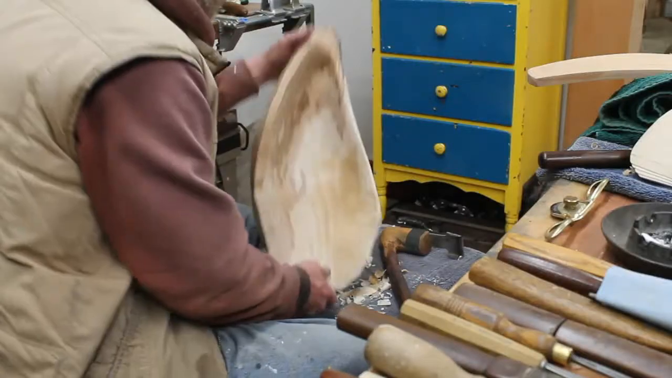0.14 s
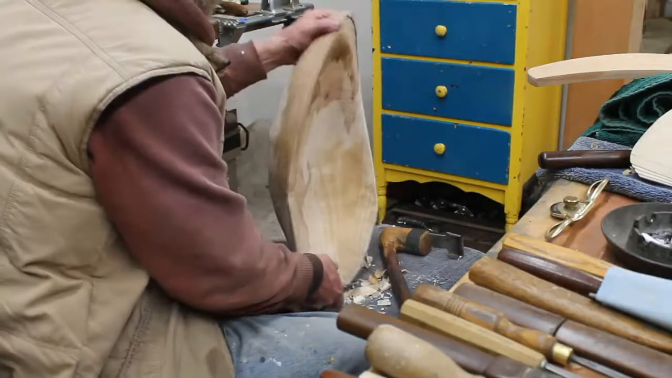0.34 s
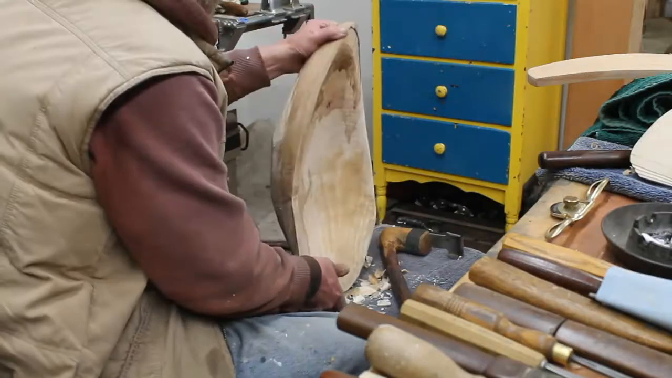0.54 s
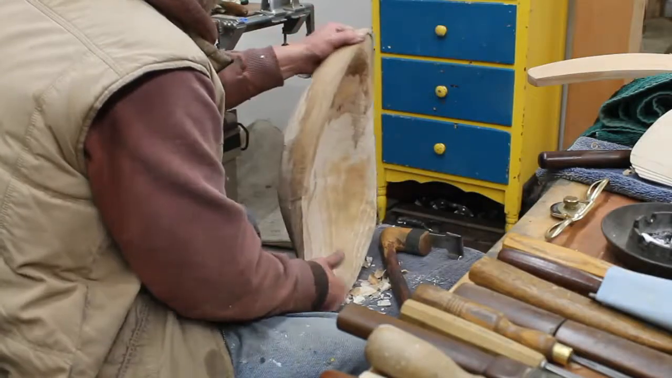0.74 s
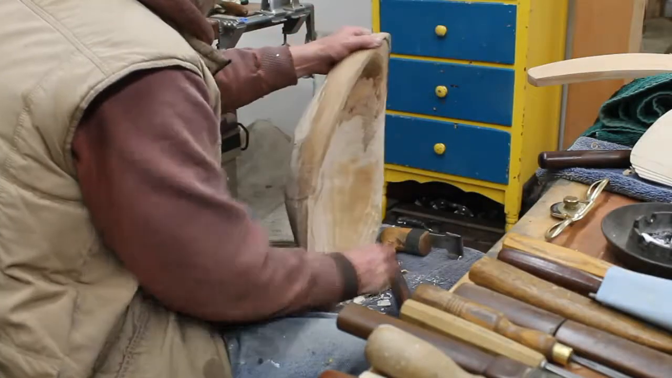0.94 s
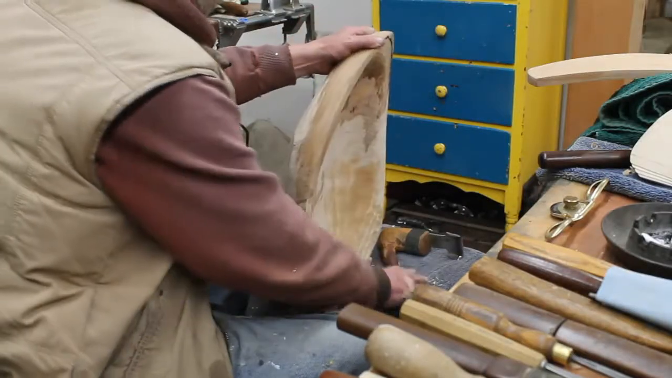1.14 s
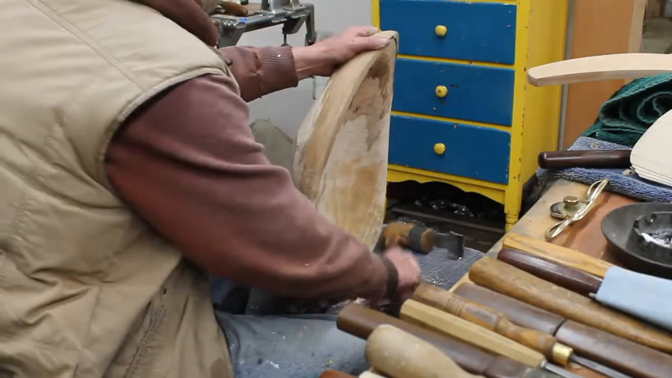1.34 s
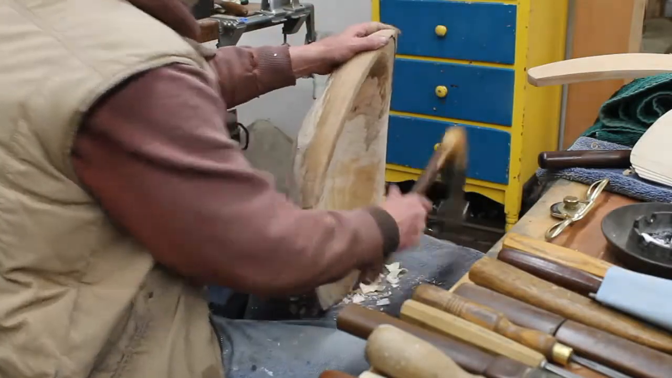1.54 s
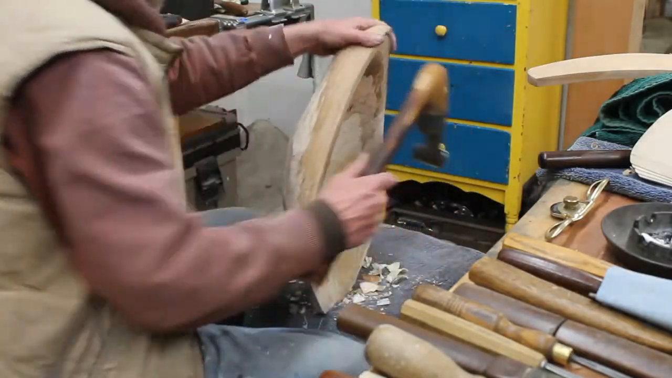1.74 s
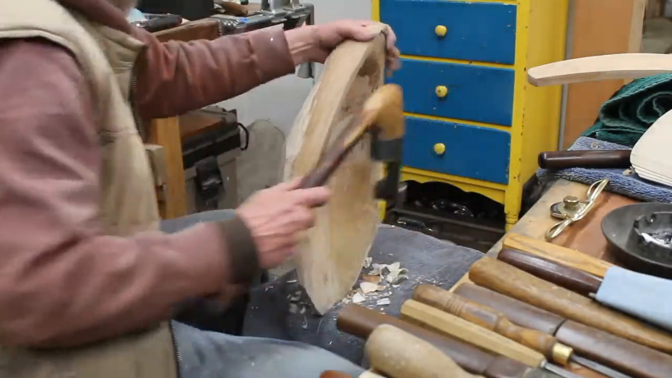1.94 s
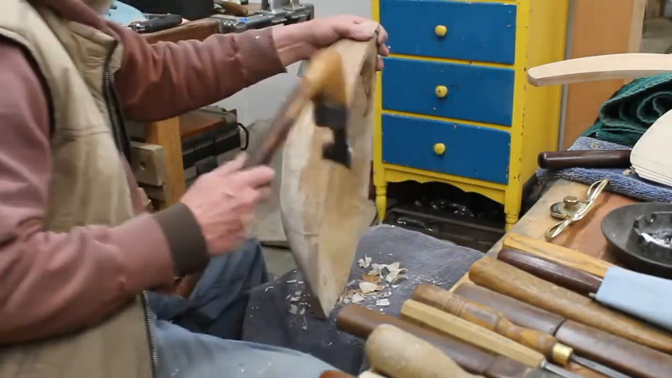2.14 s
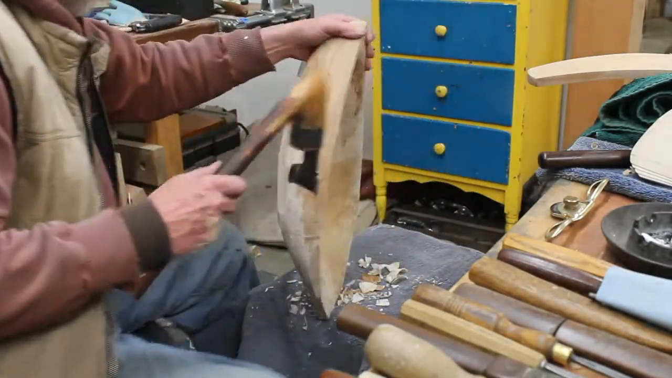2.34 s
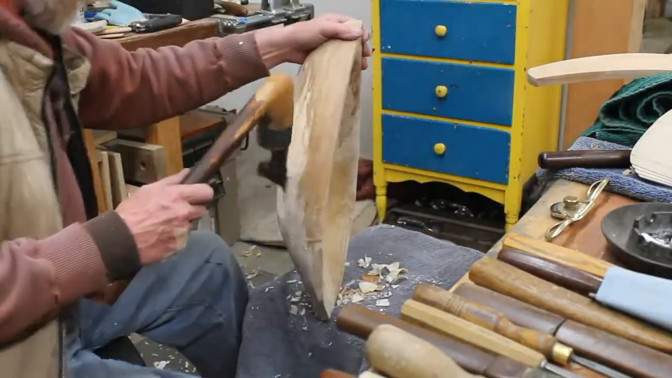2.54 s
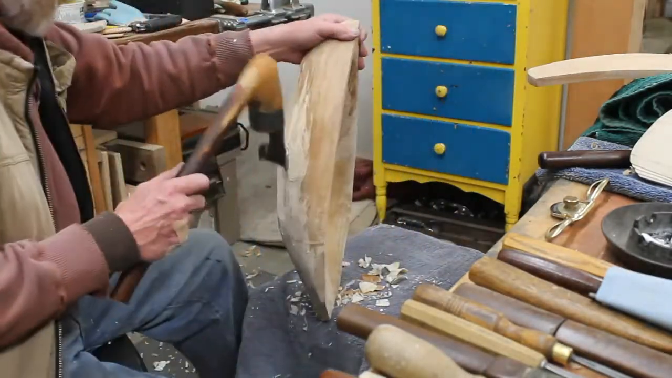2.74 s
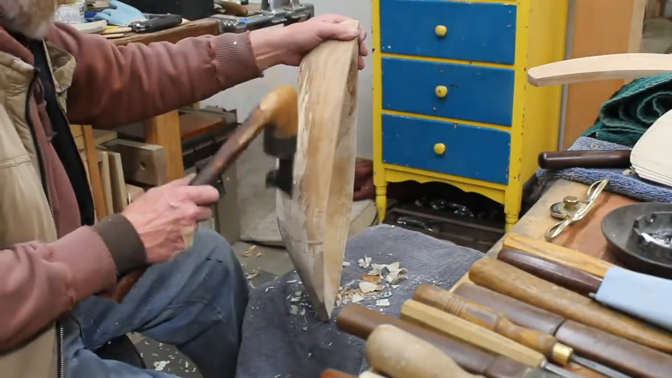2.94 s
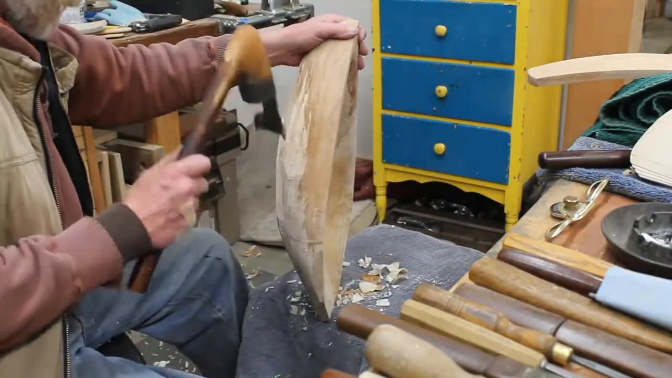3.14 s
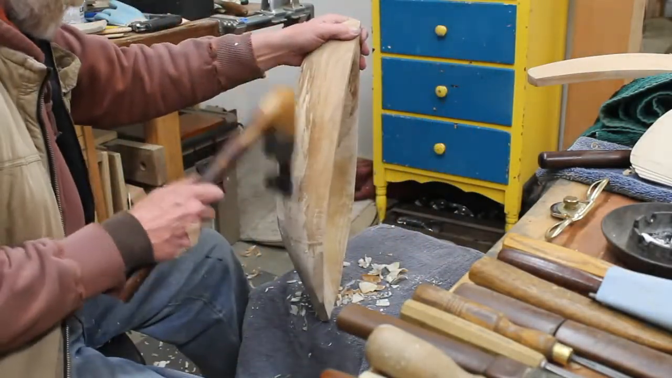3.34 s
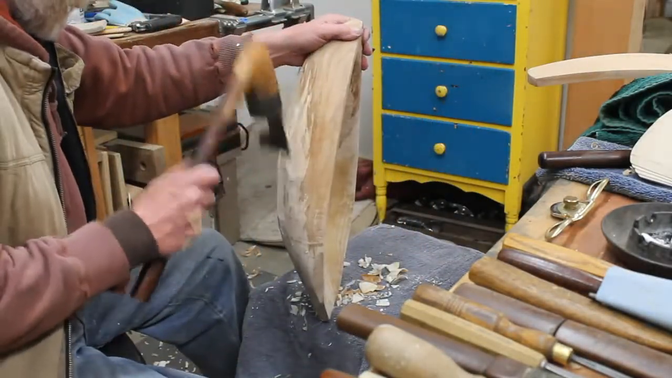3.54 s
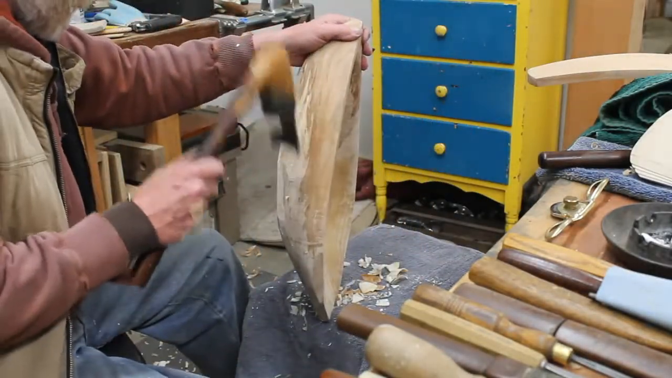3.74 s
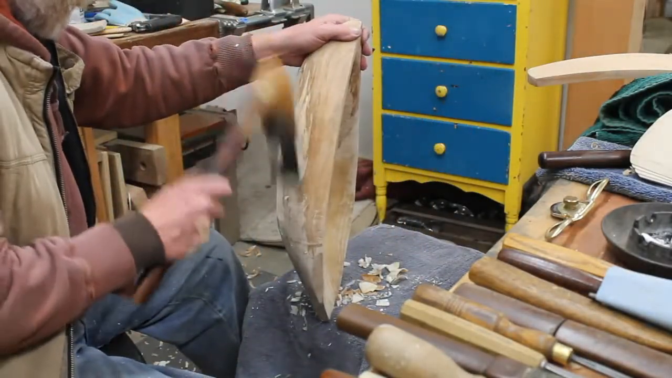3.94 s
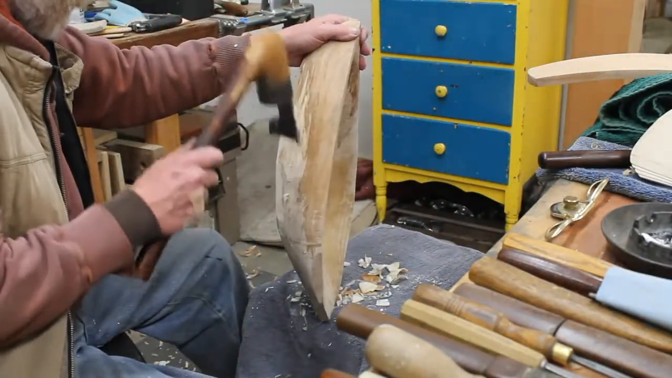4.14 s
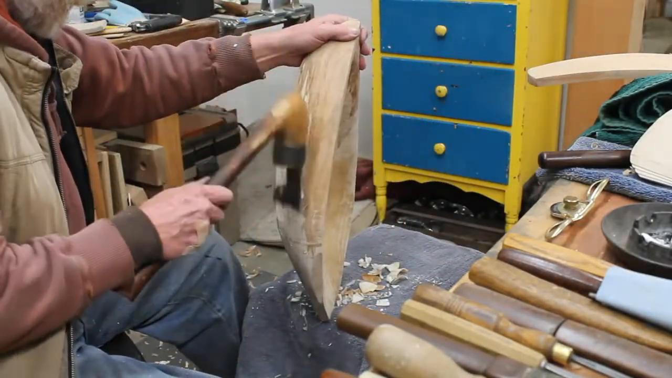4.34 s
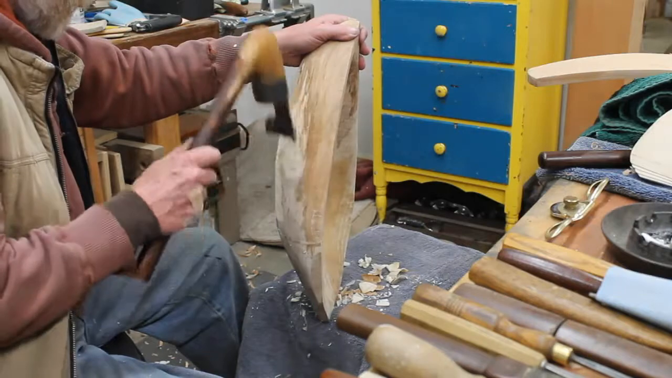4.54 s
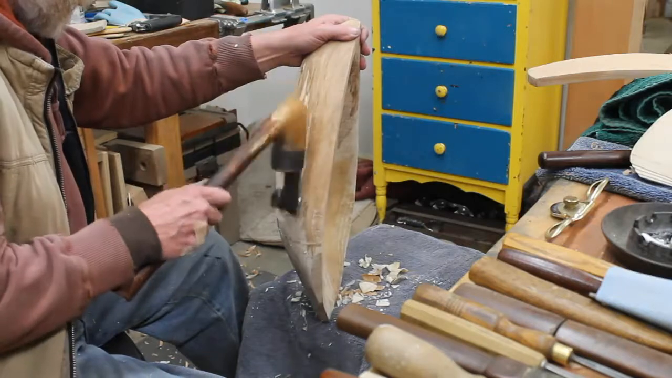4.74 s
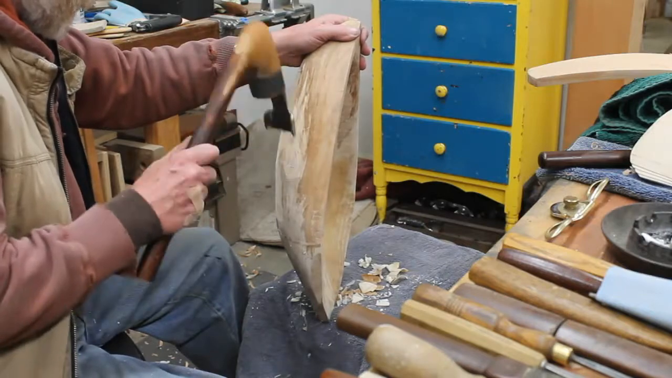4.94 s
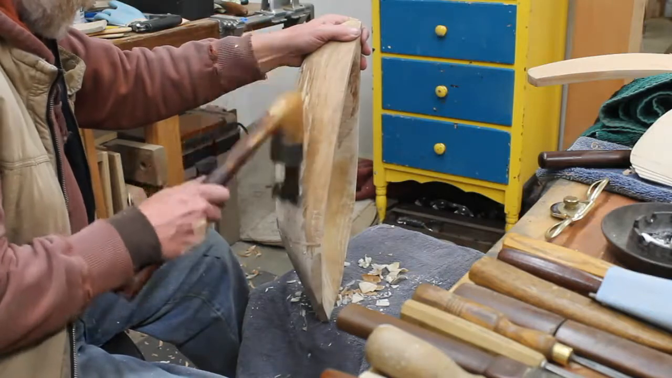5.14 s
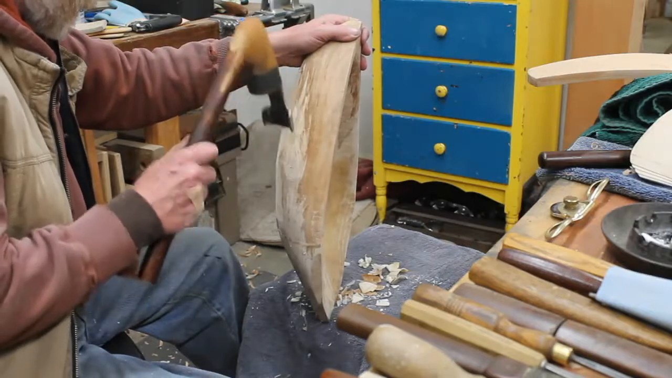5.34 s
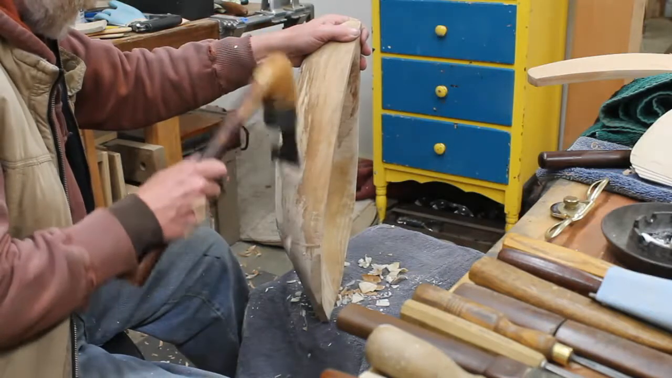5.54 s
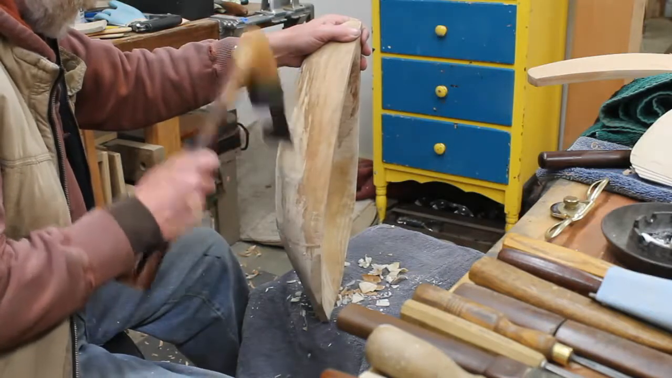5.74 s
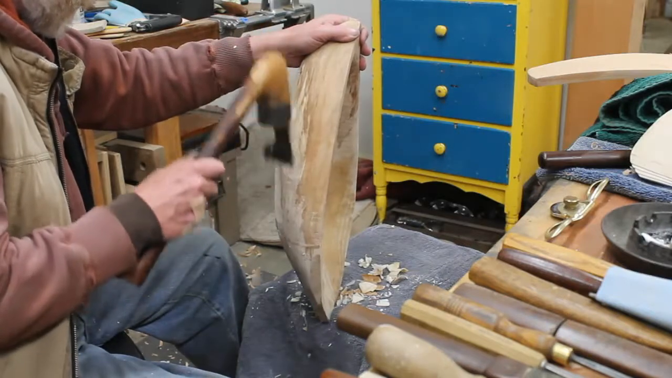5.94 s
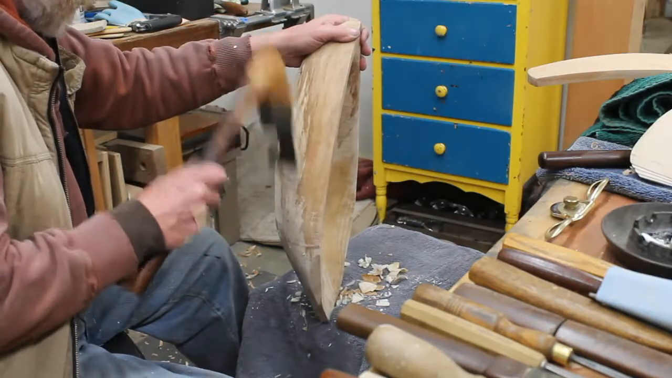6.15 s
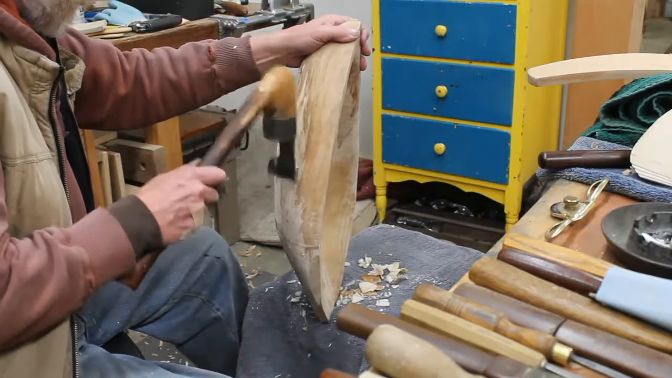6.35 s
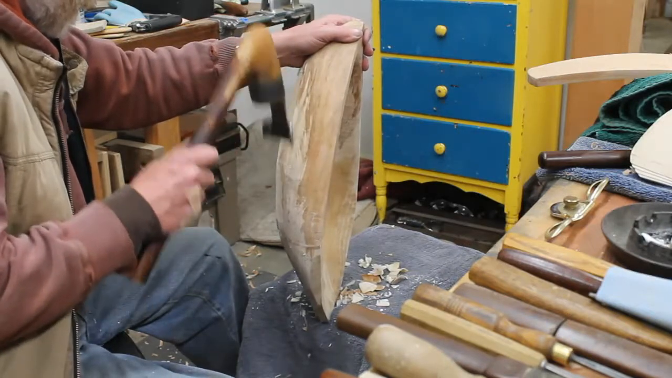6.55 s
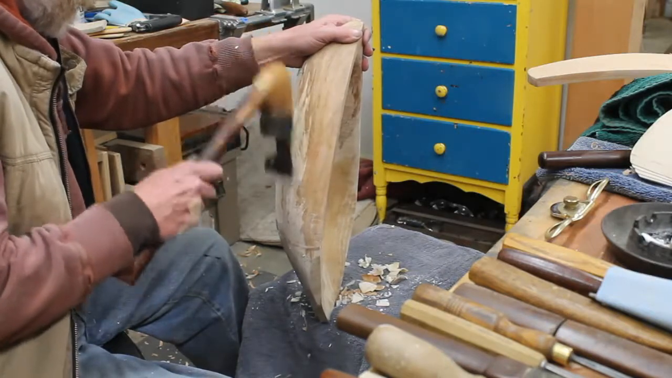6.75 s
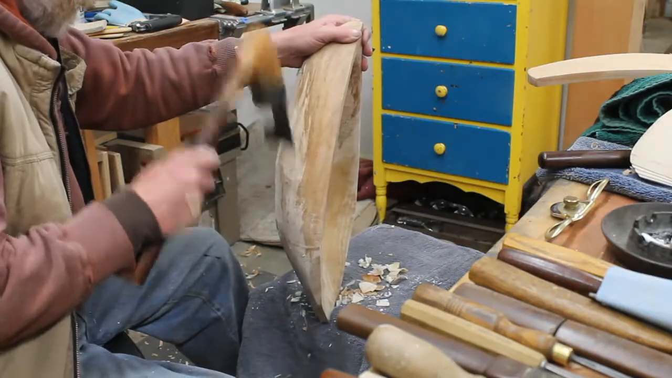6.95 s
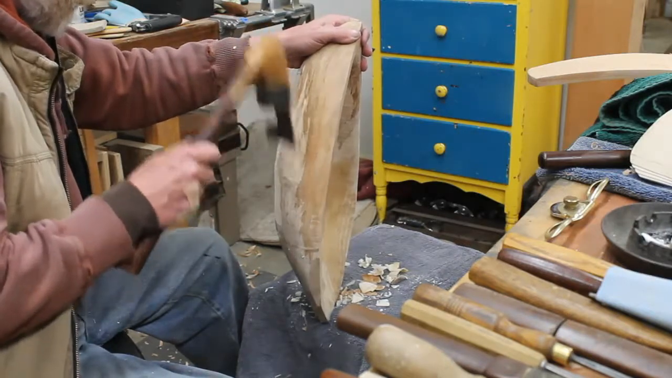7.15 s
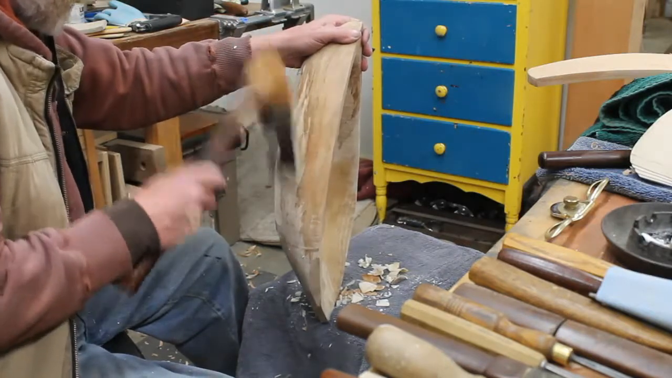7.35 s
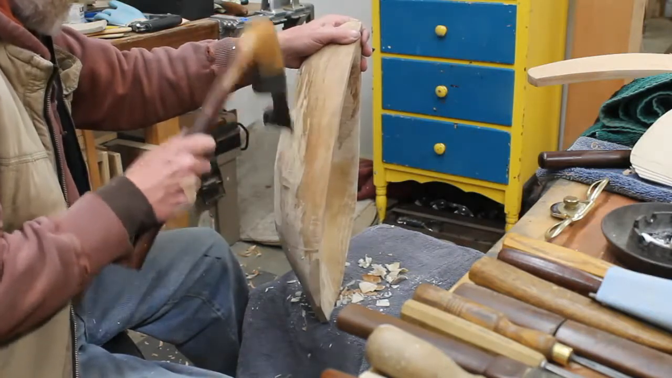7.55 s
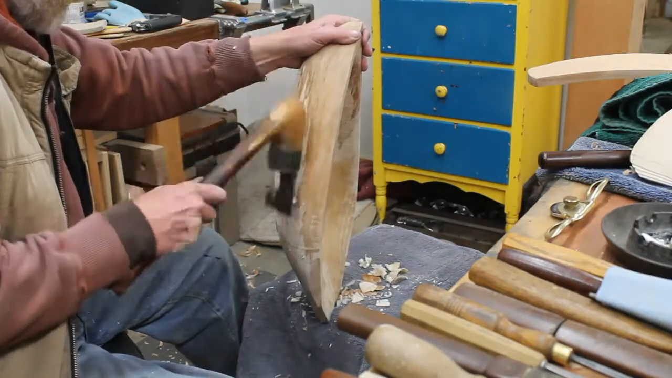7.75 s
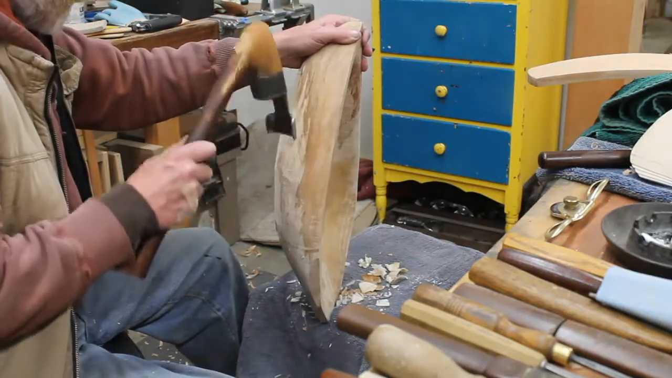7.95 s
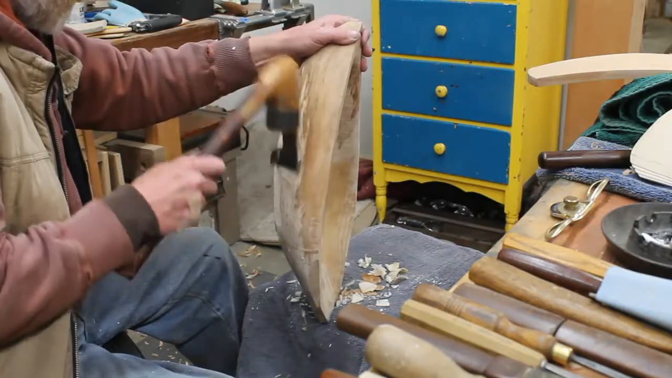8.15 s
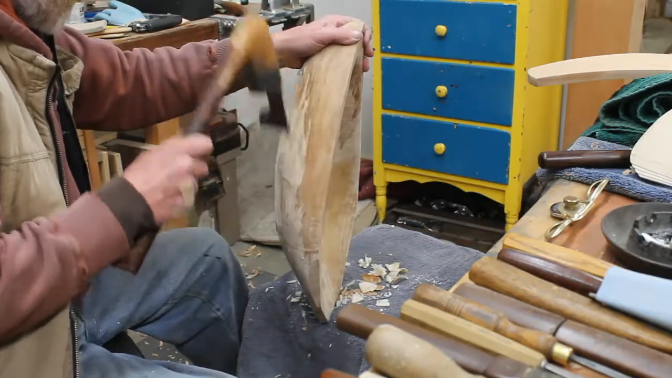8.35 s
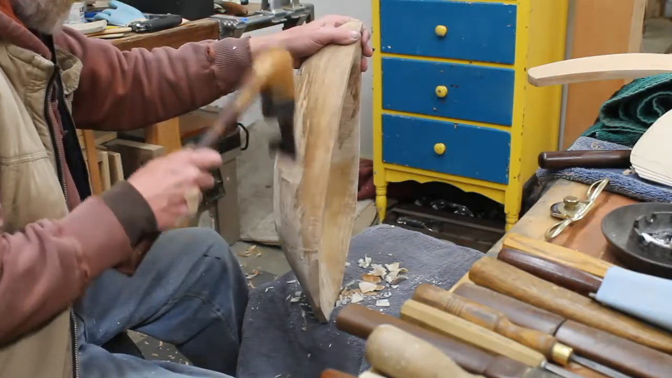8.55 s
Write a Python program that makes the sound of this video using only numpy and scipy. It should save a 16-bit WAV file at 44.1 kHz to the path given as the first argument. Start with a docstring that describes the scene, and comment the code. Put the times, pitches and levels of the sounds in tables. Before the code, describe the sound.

A jacket rustles as a wooden blank is handled, then a small hatchet chops it steadily with hollow knocks in a workshop.

```python
"""A small hatchet roughs out a block of green wood (the blank for a bowl) on a padded workshop bench.
First a jacket swishes and flops as the blank is turned, with bumps, ticks and clinks over quiet air.
Near 2 s the hatchet is picked up and its handle rubs in the hand. From 3.3 s come fifteen chops:
each knocks the hollow blank, rings the steel head, tears fibres and shakes the bench; the room echoes."""
import sys
import numpy as np
from scipy import signal
from scipy.fft import rfft, irfft, next_fast_len
from scipy.io import wavfile
from scipy.ndimage import uniform_filter1d

SR = 44100
rng = np.random.default_rng(int(sys.argv[2]) if len(sys.argv) > 2 else 0)


def put_to_file(sound):
    """Save the sound as 16-bit audio at rate SR, in the file named by the first command-line argument."""
    columns = np.atleast_2d(sound).T  # one column per channel
    safe = np.clip(columns, -1, 1)
    whole_steps = np.round(safe * 32767)
    wavfile.write(sys.argv[1], SR, whole_steps.astype(np.int16))


N = 379701
TIME = np.arange(N) / SR
HIT = int(.7 * SR)  # samples in one hit
AGE = np.arange(HIT) / SR  # seconds since a hit began

# tone of flapping cloth: f/Hz, level/dB
FLAP_TONE = [(30, -34), (70, -15.5), (130, -8.5), (220, 2.5), (330, 3), (450, -19), (900, -42)]
# tone of splitting wood and hard ticks: f/Hz, level/dB
SNAP_TONE = [(400, 2.5), (1500, 12.5), (3000, 11), (5000, 7.5), (7000, 6), (10500, 1.5), (12500, 6),
             (16000, 4.5)]


def gain(db):
    """Turn decibels into a multiplier."""
    return 10 ** (np.asarray(db) / 20)


def fade(t60):
    """Die away by 60 dB every t60 seconds."""
    return np.exp(-np.log(1000) * AGE / t60)


def along(points, hz):
    """Read between (frequency, value) points on a scale of octaves."""
    f, value = np.transpose(points)
    return np.interp(np.log(hz + 1), np.log(f), value)


def bins(size):
    """The frequencies in the spectrum of this many samples."""
    return np.arange(size // 2 + 1) * SR / size


def octaves(hz, centre_hz):
    """Octaves above (+) or below (-) a centre."""
    return np.log2((hz + 1) / centre_hz)


def colour(x, db):
    """Filter a hit by the given dB at bins(2 * HIT)."""
    cepstrum = irfft(np.log(gain(db)))
    cepstrum[1:HIT] *= 2  # folded so that nothing sounds before the hit
    cepstrum[HIT + 1:] = 0
    return irfft(rfft(x, 2 * HIT) * np.exp(rfft(cepstrum)))[:HIT]


def stream(x, tone):
    """Give a long noise its tone, at an average (rms) level of 1."""
    size = next_fast_len(N + N % 2, True) * 2
    y = irfft(rfft(x, size) * gain(along(tone, bins(size))))[:N]
    return y / y.std()


def low_cut(x, hz):
    """Remove the bass below hz."""
    return signal.sosfilt(signal.butter(4, hz, "high", fs=SR, output="sos"), x)


def level(x, db):
    """Scale a hit so that its energy, spread over 50 ms, has this level."""
    return x * gain(db) / np.sqrt(np.sum(x ** 2) * 20 / SR)


def add(out, s, x):
    """Mix a sound in at s seconds."""
    start = max(int(s * SR), 0)
    out[start:start + len(x)] += x[:N - start]


def later(x, s):
    """Delay a hit by s seconds."""
    return np.pad(x, (max(int(s * SR), 0), 0))[:HIT]


def ring(modes, scatter, uneven_db=0):
    """An object's fading notes (modes); pitch and strength vary with the grip and where it is struck."""
    out = 0
    for hz, db, t60 in modes:
        detune, share, sign = rng.standard_normal(3)
        note = np.sin(2 * np.pi * hz * (1 + scatter * detune) * AGE)
        out = out + np.sign(sign) * gain(db + uneven_db * share) * fade(t60) * note
    return out


def crackle(size, spread_db):
    """Dense tiny snaps of uneven strength, at an average level of 1."""
    x = rng.standard_normal(size) * gain(spread_db * np.minimum(rng.exponential(size=size), 6))
    return x / x.std()


def wander(rate):
    """A smooth random wobble of about 1 either way, with rate new values a second."""
    hold = int(SR / rate)
    steps = np.repeat(rng.standard_normal(N // hold + 1), hold)
    return 1.3 * uniform_filter1d(uniform_filter1d(steps, hold), hold)[:N]


def stroke(peak_s, rise_s, fall_s):
    """One movement: from rest smoothly up to 1 and back."""
    phase = np.interp(TIME, [peak_s - rise_s, peak_s, peak_s + fall_s], [-1, 0, 1])
    return (1 + np.cos(np.pi * phase)) / 2


def workshop(wet_db, early_db=-2):
    """The room: direct sound, quick echoes off bench and cabinet, and a tail that grows duller."""
    # how long the room rings: f/Hz, t60/s
    decay = [(100, 0.45), (500, 0.59), (1400, 0.53), (4000, 0.54), (10000, 0.43), (16000, 0.2)]
    hz, noise = bins(HIT), rfft(crackle(HIT, 2.05))
    tail = 0
    for centre_hz in 62.5 * 2. ** np.arange(9):
        band = irfft(noise * np.maximum(1 - abs(octaves(hz, centre_hz)), 0), HIT)
        tail = tail + band * fade(along(decay, centre_hz))
    early = crackle(HIT, 7.1) * fade(0.12)
    echoes = tail / np.linalg.norm(tail) + gain(early_db) * early / np.linalg.norm(early)
    room = later(echoes, .004) * gain(wet_db)
    room[0] += 1  # the direct sound
    return room


def heard(x, room, db):
    """A hit as it arrives through the room, at level db."""
    return level(signal.fftconvolve(x, room)[:HIT], db)


def taps(table, tone, t60, focus_db, wet_db):
    """Short contacts, each turned down by focus_db per octave away from its own centre."""
    out, hz = np.zeros(N), bins(2 * HIT)
    for s, db, centre_hz in table:
        shape = along(tone, hz) - focus_db * np.minimum(abs(octaves(hz, centre_hz)), 4)
        tap = colour(crackle(HIT, 1.4) * fade(t60), shape)
        add(out, s, heard(tap, workshop(wet_db, early_db=-5.5), db))
    return out


def air():
    """The quiet air of the shop: a soft noise that wavers slightly."""
    # tone of the air: f/Hz, level/dB
    tone = [(20, -45), (40, -34), (65, -12), (140, -7), (215, -6), (415, 1), (600, -1.5), (1630, -5),
            (2000, -4.5), (3100, -8), (8000, -14.5), (16000, -24)]
    return stream(rng.standard_normal(N), tone) * gain(-61 + 0.52 * wander(3.97))


def cloth(rub_db=-6, hiss_db=-8, flap_db=-25):
    """Jacket threads catch and slip, swishing with the arm's speed; light touches hiss, firm ones rub."""
    # arm movements: fastest at t/s, speeding up/s, slowing down/s, level/dB, brightness/dB
    moves = [(.015, 0.089, 0.03, -53, 3), (.17, 0.22, .2, -55, 0.5), (.43, 0.19, .1, -53.5, -4),
             (.72, 0.13, 0.11, -55.5, -2), (.83, 0.1, 0.1, -54, -6), (1.11, 0.27, 0.14, -58.5, -1.5),
             (1.37, 0.5, 0.29, -57.5, -1.5), (1.88, 0.41, 0.3, -51.5, -3.5), (2.14, 0.19, 0.28, -58, 0.5),
             (2.32, 0.14, 0.34, -48.5, 1), (2.5, 0.23, 0.25, -41, -0.5), (2.631, 0.081, 0.052, -34, 2.5),
             (2.705, 0.056, 0.058, -40, -1.5), (3.115, 0.12, 0.098, -53.5, 1)]
    # tones of the sliding weave: f/Hz, level/dB
    rub_tone = [(180, -45), (330, -9), (650, 0), (1300, -1), (2000, -11), (4000, -35)]
    swish_tone = [(800, -6), (1500, 4.5), (2500, 2), (4500, 1.5), (6500, -2), (9000, -12.5), (14000, -70)]
    hiss_tone = [(4000, -23.5), (7500, 1.5), (10000, -2), (13000, -5.5), (16000, -13)]
    swish = rub = hiss = 0
    for s, rise_s, fall_s, db, bright_db in moves:
        slide = stroke(s, rise_s, fall_s) * gain(db)
        swish = swish + slide ** 2
        rub = rub + (slide * gain(rub_db - bright_db)) ** 2
        hiss = hiss + (slide * gain(hiss_db + bright_db)) ** 2
    # the folds stir even in slow movements
    flap = swish.max() * (swish / swish.max()) ** 0.59 * gain(flap_db) ** 2
    catch = gain(2.5 * wander(70))
    out = 0
    for tone, power in (FLAP_TONE, flap), (rub_tone, rub), (swish_tone, swish), (hiss_tone, hiss):
        out = out + stream(crackle(N, 2.0) * catch, tone) * np.sqrt(power)
    room = workshop(wet_db=-1, early_db=-11)
    out = signal.fftconvolve(out, room / np.linalg.norm(room))[:N]
    return low_cut(out, 135)  # the cloth's bass below 135 Hz is removed


def clinks(t60=0.0063):
    """Loose chips and tools are jolted on the bench and ring briefly."""
    # jolts: t/s, level/dB, f/Hz
    jolts = [(.2468, -48, 4700), (.358, -55, 4800), (3.899, -57.5, 2450), (6.49, -52.5, 3530)]
    out, room = np.zeros(N), workshop(wet_db=-2)
    for s, db, hz in jolts:
        modes = [(0.88 * hz, -4, t60), (hz, 0, t60), (0.75 * hz, -4, t60)]
        add(out, s, heard(ring(modes, scatter=0.0091), room, db))
    return out


def bumps():
    """Hand and handle bump the wood."""
    # bumps: t/s, level/dB, centre f/Hz
    hits = [(.247, -45.5, 1850), (.357, -53, 2030), (.422, -48, 870), (.47, -57, 600), (1.731, -49.5, 1010),
            (1.912, -44.5, 1230), (1.962, -41, 1160), (2.125, -40.5, 1410), (2.26, -40.5, 990),
            (3.565, -54, 1460), (3.75, -50, 770), (4.678, -47.5, 1600), (6.166, -54.5, 704)]
    # tone of bumped wood: f/Hz, level/dB
    tone = [(70, -35), (200, 3.5), (400, 1), (650, 6), (1100, -5), (2500, -3.5), (5000, -23.5), (9000, -12),
            (16000, -31)]
    return taps(hits, tone, t60=0.015, focus_db=6.0, wet_db=0.5)


def ticks():
    """The tool, splinters and jacket fastenings make small hard contacts."""
    # ticks: t/s, level/dB, centre f/Hz
    hits = [(.2485, -48.5, 2250), (.357, -62, 2400), (1.874, -51.5, 5050), (1.962, -51, 2180),
            (2.125, -48, 2800), (2.275, -44, 4600), (2.286, -52, 4400), (2.439, -37.5, 3480),
            (2.4605, -36.5, 2580), (2.472, -33.5, 3720), (2.698, -38.5, 3600), (2.711, -38.5, 3340),
            (3.549, -69, 4000), (4.388, -51, 5600), (6.135, -56, 3540), (7.4008, -47.5, 3620),
            (8.045, -57.5, 4540)]
    return taps(hits, SNAP_TONE, t60=0.019, focus_db=7.5, wet_db=-5.0)


def folds():
    """Heavy folds of the jacket flop over."""
    # flops: t/s, level/dB, centre f/Hz
    flops = [(.425, -61, 260), (1.335, -64, 230), (1.41, -61, 259), (2.485, -53.5, 210)]
    return taps(flops, FLAP_TONE, t60=0.13, focus_db=8, wet_db=-1)


def handle_rub():
    """The handle sticks and slips through the fingers as the hatchet is picked up."""
    # shifts of grip: firmest at t/s, tightening/s, easing/s, level/dB
    grips = [(1.775, 0.055, 0.15, -45.5), (1.9, 0.052, 0.12, -47), (2.135, .02, 0.1, -55),
             (2.28, .04, 0.058, -54)]
    # the handle's own notes: f/Hz, level/dB, t60/s
    modes = [(610, 0, 0.041), (665, -8.5, 0.026), (900, -3, 0.048), (1240, -7, 0.017), (2020, -1.5, 0.013),
             (2680, 2, 0.014)]
    slips = crackle(N, 6) * gain(-0.5 * wander(45.6))
    rub = signal.fftconvolve(slips, ring(modes, scatter=.005))[:N]
    rub = low_cut(rub, 290)  # the rub's bass below 290 Hz is removed
    pressure = sum(stroke(s, rise_s, fall_s) * gain(db) for s, rise_s, fall_s, db in grips)
    return rub / rub.std() * pressure


def touch_and_bite(x, delay, touch_db):
    """The edge first touches lightly, then bites with full force."""
    return gain(touch_db) * x + later(x, delay)


def knock(delay, tilt):
    """The edge wedges in with a short, rough knock; a sharper blow brings out the treble."""
    # tone of the knocked blank: f/Hz, level/dB
    tone = [(90, -20.5), (165, -15), (200, -2), (340, 1.5), (540, 1.5), (900, 5.5), (1400, 2), (1750, -12),
            (2200, -1), (3600, -11), (5500, -12.5), (8000, -18), (15000, -33)]
    hz = bins(2 * HIT)
    push = touch_and_bite(crackle(HIT, 0.98) * fade(0.039), delay, touch_db=-10)
    return colour(push, along(tone, hz) + tilt * np.clip(octaves(hz, 1000), 0, 2))


def hollow_ring():
    """The bowl flexes as a whole and sounds hollow."""
    # the bowl's low notes: f/Hz, level/dB, t60/s
    modes = [(387.4, -14.5, 0.24), (402, 2, 0.14), (434, -1.5, 0.11), (457, -0.5, 0.17), (488.4, -3, 0.12)]
    return ring(modes, scatter=0.0087, uneven_db=0.4)


def wall_ring(delay, centre_hz, reach_octaves=0.13):
    """The bowl's wall rings; where the blow lands favours the notes near one pitch."""
    # the wall's notes: f/Hz, level/dB, t60/s
    modes = [(925, -10.5, 0.085), (1030, -2, 0.009), (1150, 0.5, 0.02), (1260, -4, 0.054),
             (1298.7, 5.5, 0.072), (1320, -7, 0.018), (1401, 3.5, 0.025), (1427, 4, 0.016),
             (1473, -4, 0.058), (1553, -3.5, 0.037), (1960, -1, 0.037), (2027, -8.5, 0.069),
             (2190, 1, 0.021), (2940, -19, 0.04), (2948, -8, 0.042)]
    struck = [(f, db - 9 * min(abs(octaves(f, centre_hz)) / reach_octaves, 1), t60)
              for f, db, t60 in modes]
    return touch_and_bite(ring(struck, scatter=0.0016, uneven_db=0.2), delay, touch_db=-33)


def steel_ring(delay, hz):
    """The tighter the wood grips the steel head, the higher, shorter and more smeared its ping."""
    # the free head's notes: f/Hz, share of the pitch rise, level/dB, t60/s
    modes = [(4388, 1.04, 4, 0.053), (4740, 0.58, -14, 0.025), (4355, 0.68, 1.5, 0.038),
             (4404, 1.36, -4, 0.04), (6120, 0.14, -16, 0.03), (8750, 0.28, -8.5, 0.058)]
    rise_hz = hz - modes[0][0]
    damping = 1 + abs(rise_hz) / 450
    gripped = [(f + share * rise_hz, db, t60 / damping) for f, share, db, t60 in modes]
    return touch_and_bite(ring(gripped, scatter=0.0098, uneven_db=1.5), delay, touch_db=-12.5)


def shaving(delay, tilt, skid_s=0.0099, split_s=0.0018):
    """The edge clicks on the wood, fibres give way in one burst, and stray splinters snap after it."""
    # a blade that skids before it bites touches more lightly
    touch = gain(-5) * np.exp(-delay / skid_s) * fade(0.024)
    burst = np.exp(-((AGE - delay - .001) / split_s) ** 2)
    splinters = later(crackle(HIT, -5.5) * fade(0.1), delay) * gain(-18)
    hz = bins(2 * HIT)
    shape = along(SNAP_TONE, hz) + tilt * np.maximum(octaves(hz, 2640), 0)
    return colour(crackle(HIT, 1.0) * (touch + burst) + splinters, shape)


def foot_thump(press_s=0.023):
    """The blow drives the foot of the blank into the padding with a dull, rough thump."""
    # tone of the thump: f/Hz, level/dB
    tone = [(90, -25.5), (170, -0.5), (320, 4), (550, -9), (850, -2.5), (1500, -36), (4000, -68)]
    push = crackle(HIT, 0.44) * (1 - np.exp(-(AGE / press_s) ** 4)) * fade(0.093)
    return colour(push, along(tone, bins(2 * HIT)))


def bench_thud():
    """The blow reaches the bench through its padding and swells slowly."""
    # notes of bench and floor: f/Hz, level/dB, t60/s, rise/s
    modes = [(60.8, -4.5, 0.43, 0.048), (105.5, 1, 0.2, 0.019), (121.8, 10, 0.16, 0.041),
             (145.8, -6, 0.3, 0.062)]
    out = 0
    for k, (hz, db, t60, rise_s) in enumerate(modes):
        swell = 1 - np.exp(-(AGE / rise_s) ** 2)
        out = out + (-1) ** k * gain(db) * fade(t60) * swell * np.sin(2 * np.pi * hz * AGE)
    return out


def chops():
    """The edge lands, wedges in and splits off a shaving; blank, head and bench ring on."""
    # blows: t/s, delay to the bite/s, knock/dB, knock tilt/(dB per octave), hollow/dB, wall/dB,
    # wall centre f/Hz, steel f/Hz, steel/dB, split/dB, split tilt/(dB per octave), thud/dB
    blows = [(3.3438, 0.003, -44, -9, -45, -60, 1130, 4350, -49.5, -73, -2, -68),
             (3.6736, .0023, -39, 1.5, -47.5, -50, 1320, 4720, -43, -44.5, -4.5, -67),
             (4.023, 0.0061, -43, 3, -44, -43, 1700, 4770, -42.5, -41.5, -3.5, -74),
             (4.3662, 0.0027, -46.5, 3, -44.5, -49, 1270, 4690, -45, -43.5, -2.5, -58),
             (4.727, 0.0035, -44, 0, -43, -59, 1280, 4400, -50, -52.5, 7, -59),
             (5.108, .0026, -45, 2, -43, -47, 1360, 4540, -45, -44.5, 1, -56),
             (5.4753, .0022, -36, -1, -37.5, -38, 1310, 4880, -41.5, -35.5, 0, -51),
             (5.8351, 0.0057, -33, -3, -36.5, -32.5, 1456, 4910, -41, -32, 1.5, -50),
             (6.205, .0073, -34.5, -5, -36, -28, 1410, 4990, -39.5, -32.5, -10.5, -48.5),
             (6.654, 0.0022, -36, 0.5, -38, -29, 1230, 5050, -47, -36.5, -5, -45),
             (7.032, .002, -38, -1.5, -38.5, -32.5, 1400, 5040, -39, -42.5, -1.5, -43.5),
             (7.4075, .0015, -40, 1.5, -45, -30, 1475, 5300, -45, -37, -4.5, -47),
             (7.753, .0017, -41, 1, -43, -44, 1380, 4990, -45.5, -42.5, -0.5, -56),
             (8.0818, .0025, -34.5, -5.5, -36.5, -32.5, 1450, 5270, -51.5, -40.5, -4, -44.5),
             (8.467, 0.00065, -40.5, 2.5, -36.5, -34, 1400, 4760, -40, -40.5, -9.5, -56)]
    out = np.zeros(N)
    for (s, delay, knock_db, knock_tilt, hollow_db, wall_db,
         wall_hz, steel_hz, steel_db, split_db, split_tilt, thud_db) in blows:
        # the blank sounds all round; the head and the cut face the listener, so they echo less
        full, half, near = workshop(wet_db=3.5), workshop(wet_db=-7), workshop(wet_db=-9)
        add(out, s, heard(knock(delay, knock_tilt), full, knock_db))
        add(out, s + delay, heard(hollow_ring(), full, hollow_db))
        add(out, s, heard(wall_ring(delay, wall_hz), full, wall_db))
        add(out, s, heard(steel_ring(delay, steel_hz), half, steel_db))
        add(out, s, heard(shaving(delay, split_tilt), near, split_db))
        add(out, s, heard(foot_thump(), near, thud_db + 3))
        add(out, s, level(bench_thud(), thud_db))
    return out


def scene():
    """Quiet air, handling and chopping, the same in both ears."""
    mono = air() + cloth() + clinks() + bumps() + ticks() + folds() + handle_rub() + chops()
    return np.array([mono, mono])


def record(dry, rumble_hz=56, top_hz=16350):
    """Cut the rumble and the highest treble."""
    top_cut = signal.ellip(10, .2, 80, top_hz, fs=SR, output="sos")
    return signal.sosfilt(top_cut, low_cut(dry, rumble_hz))


dry = scene()
out = record(dry)
put_to_file(out)
```